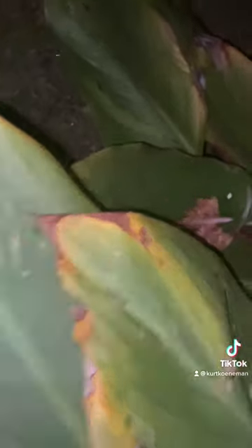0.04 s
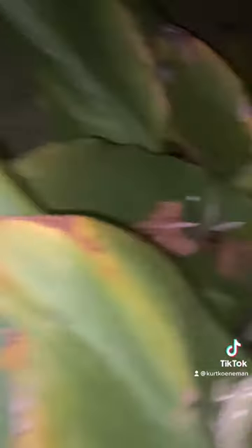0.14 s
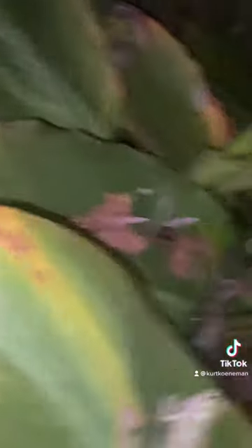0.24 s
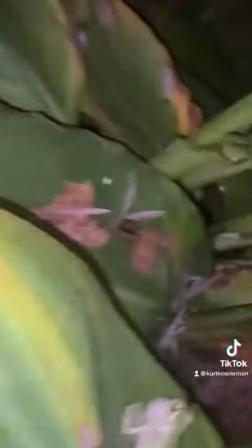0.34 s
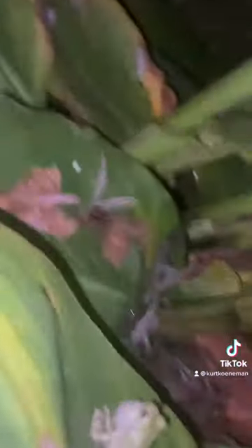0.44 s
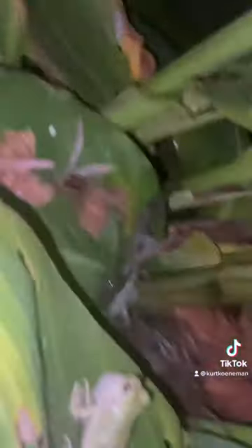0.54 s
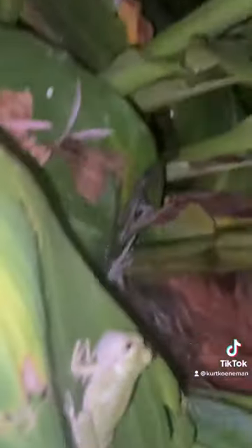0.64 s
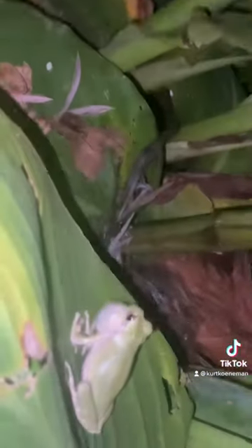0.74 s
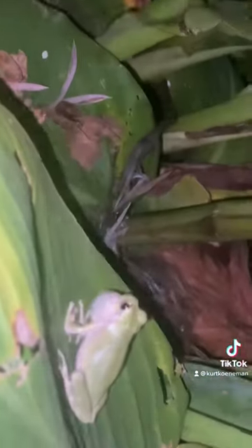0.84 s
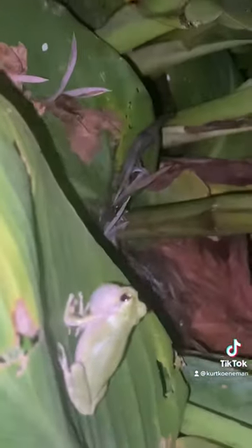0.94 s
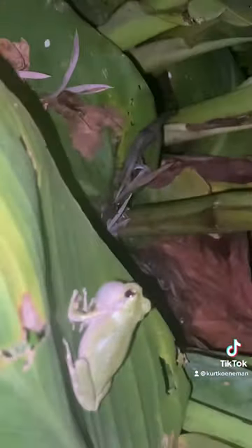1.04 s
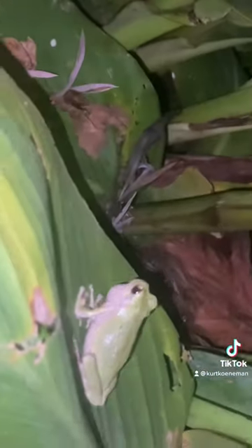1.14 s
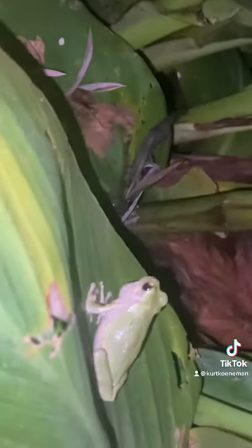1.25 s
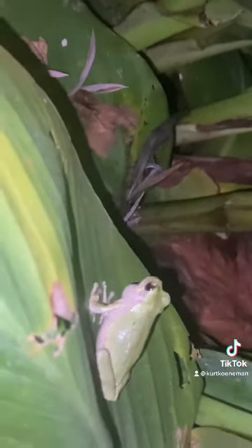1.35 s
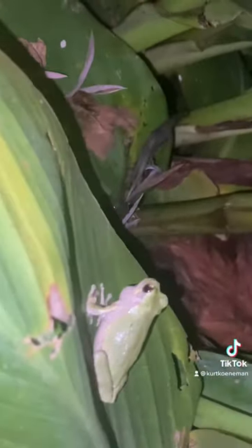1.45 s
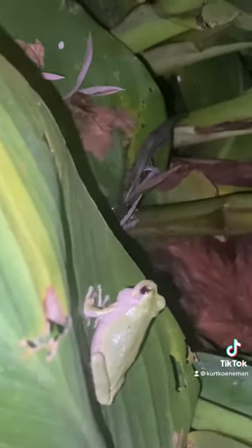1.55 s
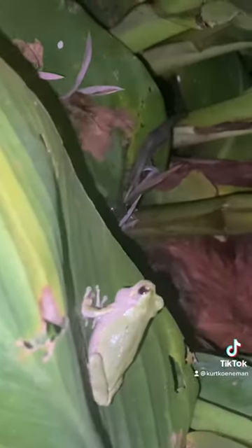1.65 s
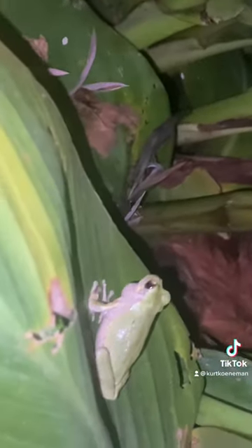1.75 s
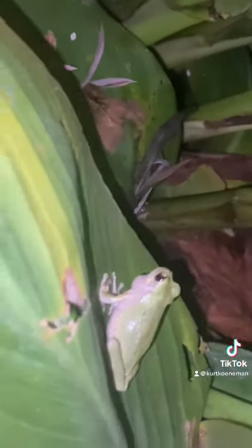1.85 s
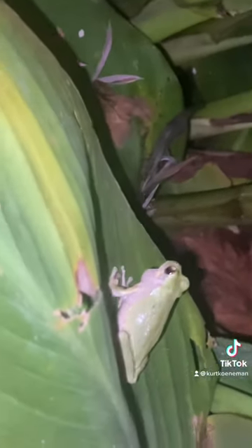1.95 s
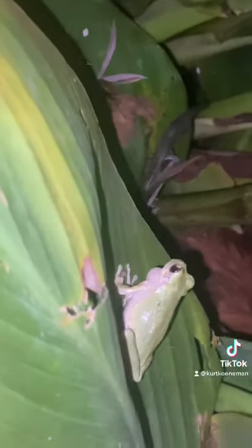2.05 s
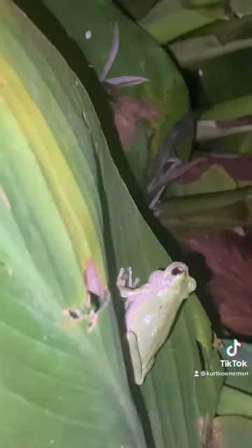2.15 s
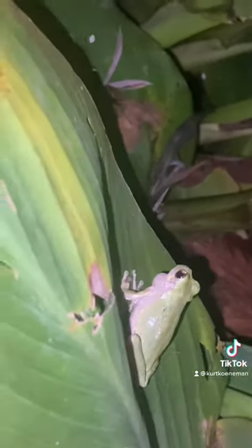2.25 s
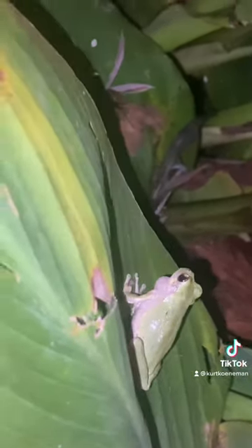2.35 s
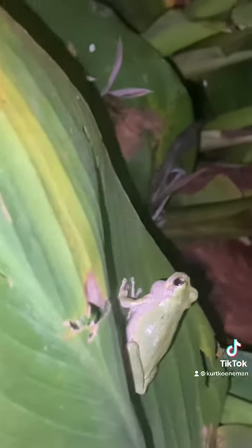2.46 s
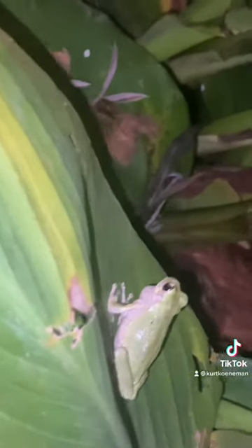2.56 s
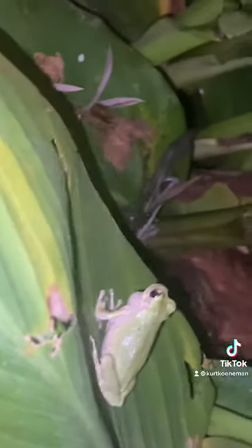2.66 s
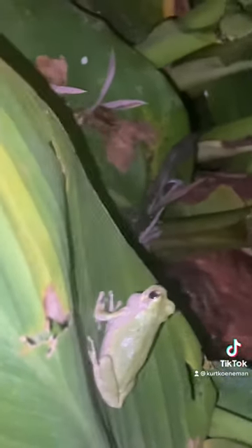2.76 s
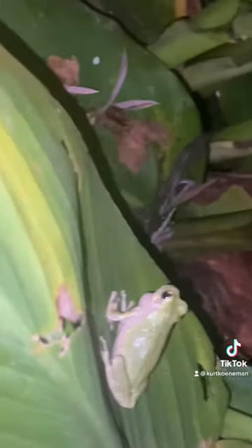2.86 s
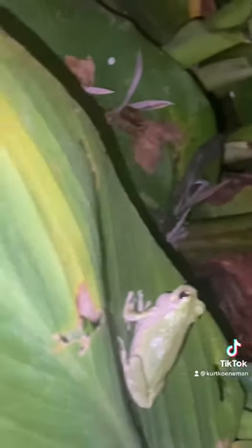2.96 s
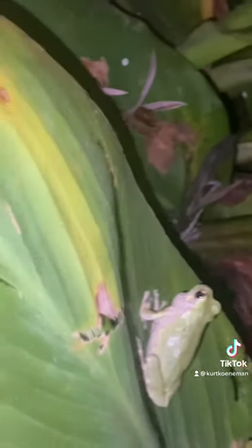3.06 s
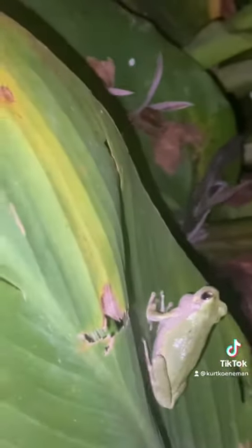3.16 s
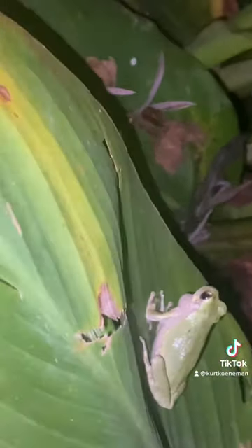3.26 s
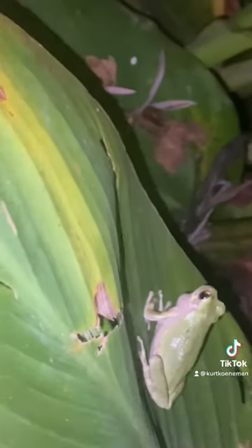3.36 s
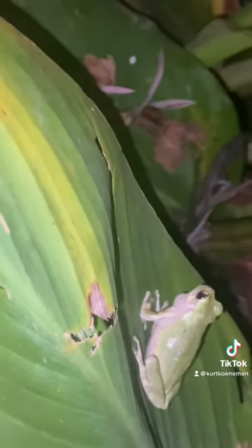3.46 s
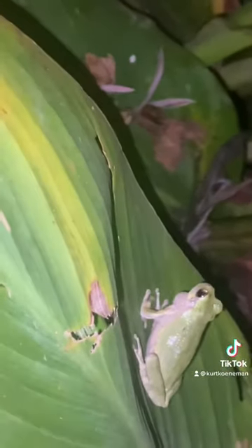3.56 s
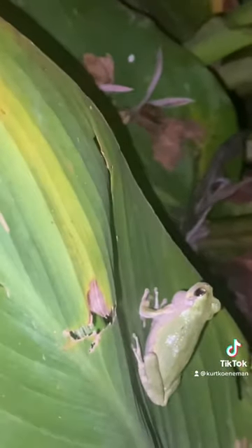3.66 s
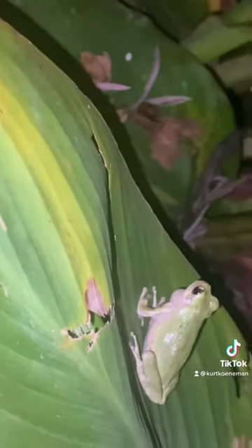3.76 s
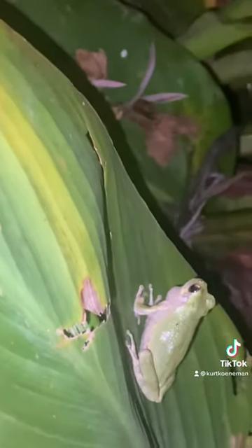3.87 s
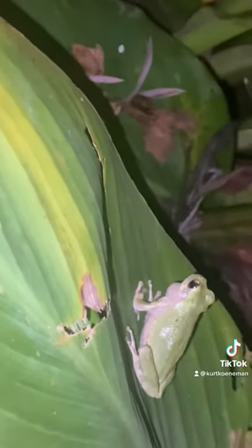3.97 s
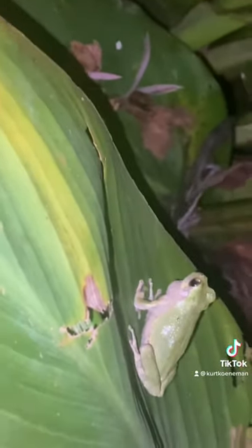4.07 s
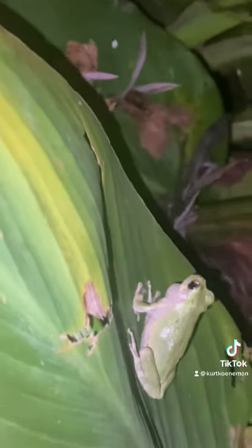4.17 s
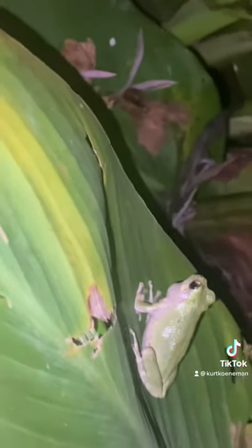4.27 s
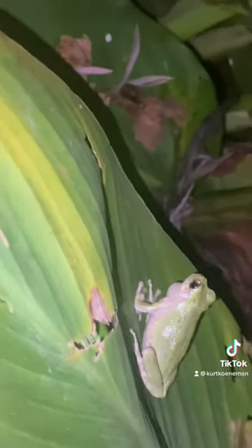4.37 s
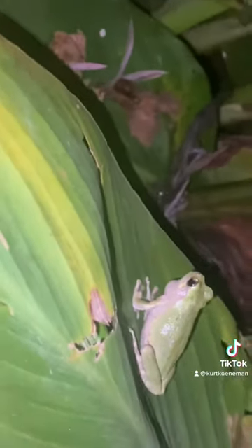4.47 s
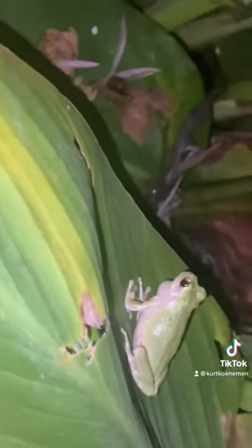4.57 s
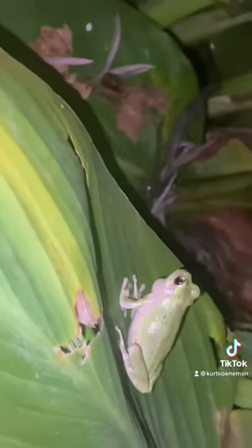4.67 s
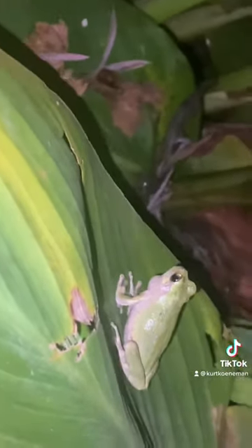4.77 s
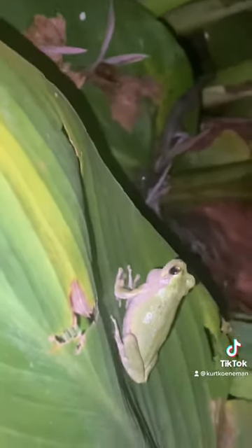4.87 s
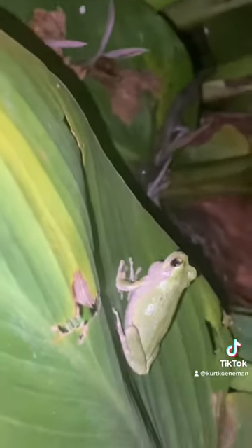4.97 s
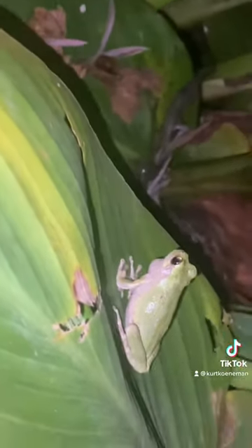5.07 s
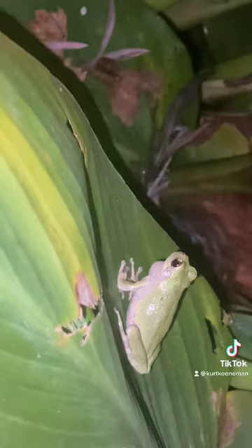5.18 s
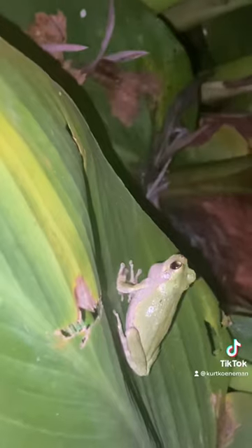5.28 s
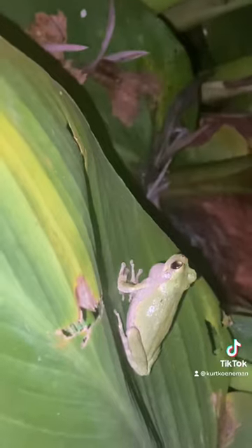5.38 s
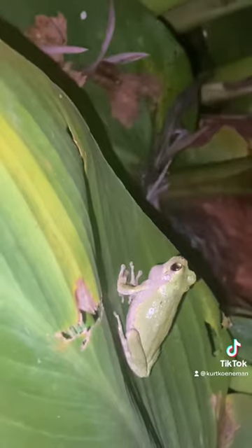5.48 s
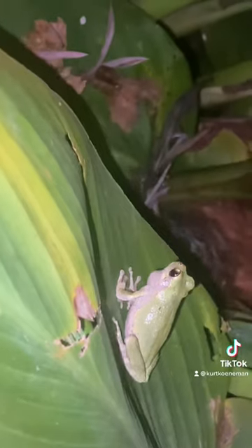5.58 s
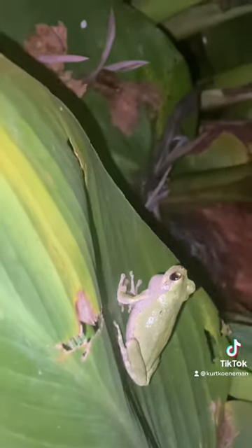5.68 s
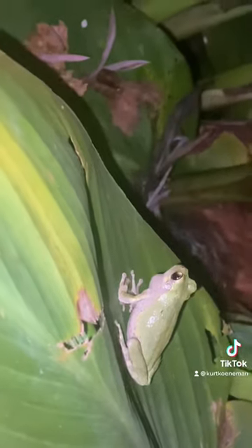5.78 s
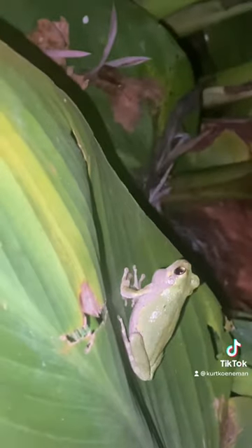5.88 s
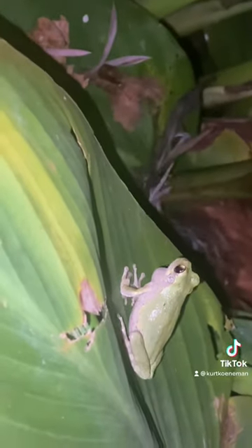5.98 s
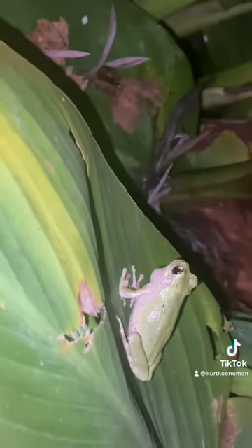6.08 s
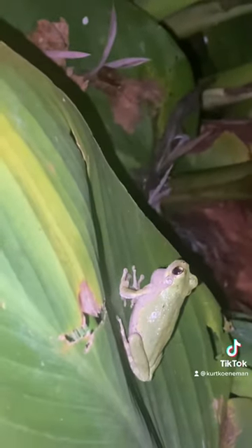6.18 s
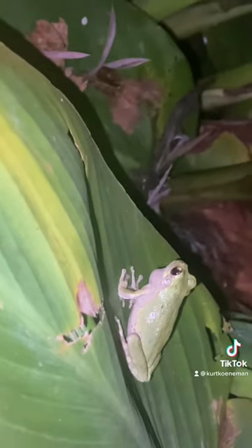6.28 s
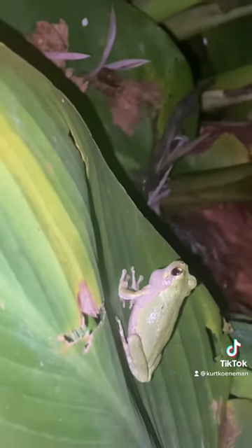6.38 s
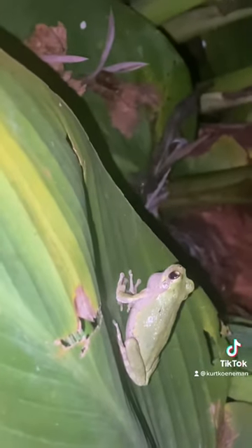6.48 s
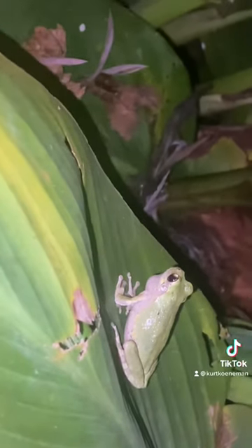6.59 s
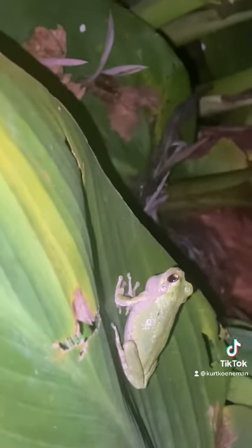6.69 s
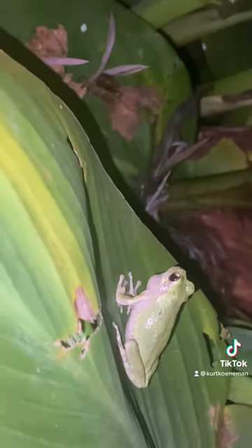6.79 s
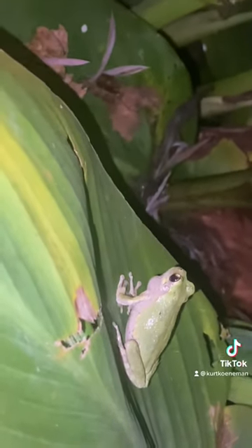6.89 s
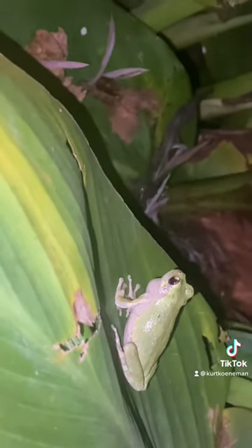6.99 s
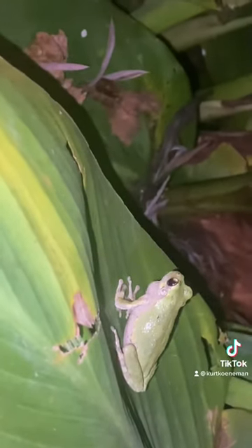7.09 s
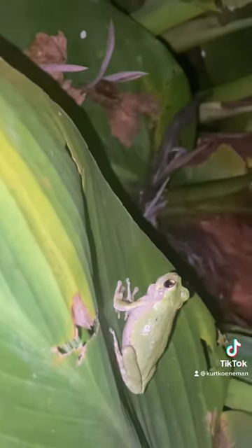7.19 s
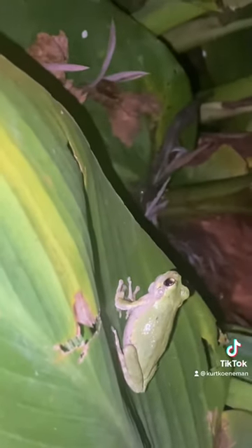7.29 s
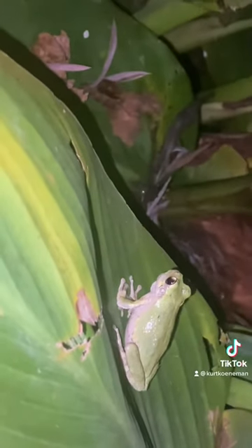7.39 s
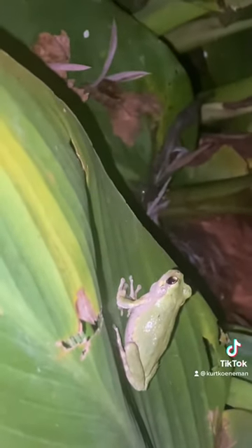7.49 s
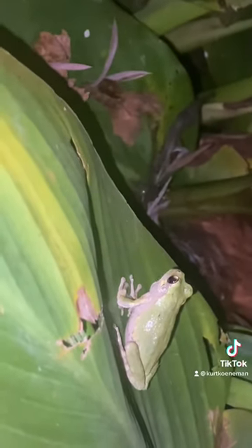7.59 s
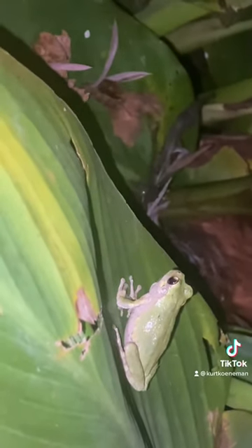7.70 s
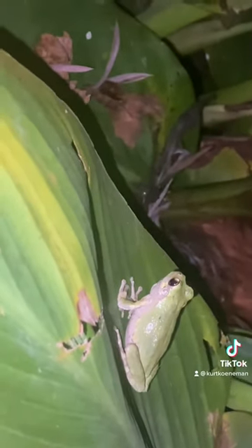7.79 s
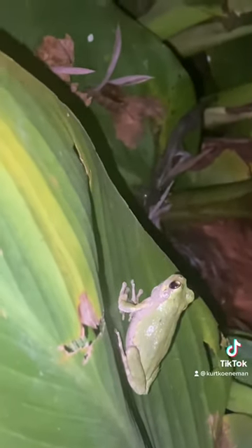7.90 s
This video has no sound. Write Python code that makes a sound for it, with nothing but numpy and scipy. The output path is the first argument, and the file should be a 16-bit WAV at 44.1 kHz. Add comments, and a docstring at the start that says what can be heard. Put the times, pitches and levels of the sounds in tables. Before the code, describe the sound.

A faint distant croak and a scratchy katydid rasp open a night garden, then a nearby frog croaks loudly, like a fast wooden ratchet with a nasal, squeaky edge. After it, weaker croaks come from farther off, alternating and overlapping with pulsing rasps and a few quick high insect zips. Continuous crickets, a washed-out frog chorus and a soft low fan hum fill the open air behind.

```python
"""Night in wet foliage: crickets trill, a far frog chorus hisses and a distant fan motor hums throughout.
A faint far croak opens the scene; katydids rasp in stroke-shaped noise; a close tree frog croaks at 0.3-1 s.
A croak is a rattle of about 60 throat pulses a second, each a short upward glide.
From 1.5 s more frogs farther off call, blurred by foliage; short high zips come at 2.4, 3.5 and 4.6 s.
Croaks and rasps alternate and overlap to the end, in stereo with one channel's treble phase turned."""
import sys
import numpy as np
from scipy import signal
from scipy.fft import rfft, irfft, next_fast_len
from scipy.io import wavfile
from scipy.ndimage import uniform_filter1d, map_coordinates

SR = 44100
rng = np.random.default_rng(int(sys.argv[2]) if len(sys.argv) > 2 else 0)


def store_pcm(level_fs):
    """Save levels as 16-bit WAV."""
    pcm = np.round(np.clip(level_fs, -1, 1) * 32767).astype(np.int16)
    wavfile.write(sys.argv[1], SR, np.atleast_2d(pcm).T)


N = 350154


def amp(db):
    """Decibels to gain."""
    return 10 ** (np.asarray(db) / 20)


def unit(x):
    """x at rms 1."""
    return x / np.sqrt(np.mean(x ** 2) + 1e-20)


def along(points, hz):
    """(f/Hz, value) points, linear in log frequency."""
    f, v = np.transpose(points)
    return np.interp(np.log(hz + 1), np.log(f + 1), v)


def wobble(rate_hz):
    """Smooth random curve, rate_hz knots a second."""
    knots = rng.standard_normal(int(N * rate_hz / SR) + 4)
    return map_coordinates(knots, [np.arange(N) * rate_hz / SR])


def filtered(x, response):
    """x times a complex response of frequency."""
    m = next_fast_len(N + SR // 4)
    return irfft(rfft(x, m) * response(np.fft.rfftfreq(m, 1 / SR)), m)[..., :N]


def noise(spectrum, side_db):
    """Stereo Gaussian noise with a dB-per-Hz spectrum; side_db sets the part the channels do not share."""
    def shape(hz):
        return amp(along(spectrum, hz)) * np.sqrt(SR / 2)

    mid, side = filtered(rng.standard_normal((2, N)), shape)
    return mid + amp(side_db) * np.array([side, -side])


def add(track, start_s, sound):
    """Mix sound into track at start_s."""
    part = track[max(0, round(start_s * SR)):][:len(sound)]
    part += sound[:len(part)]


def pulse(frog, length, dull_db):
    """One puff through the larynx: pitch slides up unevenly, each partial flares at its own time."""
    t = np.arange(1, SR // 40) / SR
    start_hz, end_hz, glide_s = frog["glide"]
    pitch_hz = end_hz + (start_hz - end_hz) * np.exp(-(t / glide_s) ** 2)
    jitter = .016 * unit(uniform_filter1d(rng.standard_normal(len(t)), size=24))
    phase = 2 * np.pi * np.cumsum(pitch_hz * (1 + jitter)) / SR
    wave = np.zeros(len(t))
    for harmonic, db, peak_s, spread in frog["partials"]:
        flare = np.exp(-.5 * (np.log(t / (peak_s * length)) / spread) ** 2)
        gain = amp(db - dull_db * harmonic + 1.35 * rng.standard_normal())
        wave += gain * flare * np.sin(round(harmonic) * phase)
    # equal energy per pulse: rms 1 at 60 pulses a second
    return wave / np.linalg.norm(wave) * np.sqrt(SR / 60)


def rattle(frog, croaks):
    """Pulse trains that swell, slow down and lengthen their pulses as the vocal sac fills."""
    track = np.zeros(N)
    for start_s, end_s, intervals, slowing, db, swell_db, fade_db in croaks:
        u = np.linspace(0, 1, round(intervals) + 1)
        times = start_s + (end_s - start_s) * (u + slowing * (u * np.sqrt(u) - u))
        lengths = 1 - 0.58 * np.exp(-(times - start_s) / 0.055)
        lengths *= 1 + .045 * rng.standard_normal(len(u))
        slack = np.exp(-(times - start_s) / 0.049)
        gains = amp(db - swell_db * slack - fade_db * u ** 2 + 0.66 * rng.standard_normal(len(u)))
        jittered = times + .00004 * rng.standard_normal(len(u))
        for t, length, gain, dull_db in zip(jittered, lengths, gains, 1.4 * slack):
            add(track, t, gain * pulse(frog, length, dull_db))
    return track


def carried(track, frog, leaves_db, t60_s, pan_db):
    """The sac rings and radiates no bass; ground and near leaves echo, deeper foliage scatters."""
    def voice_path(f):
        sac = 1 + sum(amp(db) * 1j * f * w / (c * c - f * f + 1j * f * w) for c, w, db in frog["ring"])
        echoes = 1 + sum(amp(db) * np.exp(-2j * np.pi * f * s) for s, db in frog["echoes"])
        low_cut = 1 / np.sqrt(1 + (970 / (f + 1)) ** 16)
        return sac * echoes * low_cut

    def width(f):
        return amp(along([(1500, 1), (2400, -3.5), (3600, -15)], f))

    direct = filtered(track, voice_path)
    t = np.arange(SR // 4) / SR
    tails = rng.standard_normal((2, len(t))) * amp(-60 * t / t60_s) * (1 - np.exp(-t / 0.0025))
    tails /= np.linalg.norm(tails[0])
    mid, side = signal.fftconvolve(direct[None], tails, axes=1)[:, :N] * amp(leaves_db)
    # the channels differ in level and phase, mostly in the lower voice
    lean = np.tanh(np.log(amp(pan_db)) / 2)
    side = filtered(side + lean * direct, width) + filtered(direct, lambda f: .2j * width(f))
    return direct + mid + np.array([side, -side])


# far croaks: first pulse t/s, last pulse t/s, pulse intervals (rounded), relative level/dB,
# opening swell/dB, closing fade/dB
FAR_CROAKS = [(.01, .26, 14, -50.5, 6.3, 0.5), (1.882, 2.305, 23.3, -40, 14, 6.5),
              (2.199, 2.682, 25, -46.5, 7, 5), (4.268, 4.616, 19.8, -53, 9, 11),
              (4.418, 4.895, 24.5, -43.5, 16, 3), (5.201, 5.66, 30.3, -53, 9, -6),
              (5.683, 6.12, 25, -42, 7.4, 14.5), (6.595, 7.044, 27, -42, 9.2, 4),
              (7.028, 7.506, 22, -57, 3.3, 1)]


def far_croaks():
    """Far croaks with one shared slowing (0-1), in the columns of the nearer ones."""
    slowing = .065
    return [(start_s, end_s, intervals, slowing, db, swell_db, fade_db)
            for start_s, end_s, intervals, db, swell_db, fade_db in FAR_CROAKS]


# croaks: first pulse t/s, last pulse t/s, pulse intervals, slowing (0-1), relative level/dB,
# opening swell/dB, closing fade/dB
NEAR_CROAKS = [(0.3296, 1.0164, 42, .1, -18, 12.5, 0.5)]
MIDDLE_CROAKS = [(3.1873, 3.656, 27, 0.094, -31.5, 20.3, 0), (5.4965, 5.914, 24, 0.069, -32, 18, 0)]
BACK_CROAKS = [(1.5402, 2.0583, 31, .07, -37, 25, -0.86), (6.412, 6.9658, 33, .05, -36.5, 15.6, 0)]
# single pulses around the close croak: t/s, relative level/dB, length/full pulse, dulling/(dB per harmonic)
LONE_PULSES = [(0.2837, -29.5, 0.43, 4.5), (.314, -35.5, 0.55, -1), (1.0381, -19.5, 0.77, -1)]
# frog voices. glide: start f/Hz, end f/Hz, time constant/s;
# partials: harmonic, relative level/dB, peak t/s at full length, spread/ln(t);
# echoes off ground and leaves: delay t/s, level/dB; ring of the vocal sac: f/Hz, width/Hz, level/dB
NEAR_FROG = dict(glide=(1109, 1646, 0.0052), partials=[(1, 1.5, 0.0041, 0.49), (2, 2.5, 0.0014, 0.72),
             (3, -16.5, 0.0021, 0.61), (4, -30.5, 0.0029, 0.66), (6, -25, 0.0033, 0.43),
             (7, -23, 0.0017, 0.52)], echoes=[(.00345, -12), (.00381, -12), (.0053, -21.5), (.0135, -25.5)],
             ring=[(2030, 84.3, -18), (2880, 156, -0.5), (3877, 184, 6.5), (5440, 340, -3), (8080, 110, 8),
             (8760, 200, -3)])
MIDDLE_FROG = dict(glide=(1130, 1542, 0.0047), partials=[(1, -5, 0.0037, 0.23), (2, 2, 0.002, 0.59),
               (3, -28.5, 0.0011, 0.59), (4, -26, 0.001, 0.61), (6, -27.5, 0.0046, 0.29),
               (7, -32, 0.0033, 0.62)], echoes=[(.00258, -14), (.00534, -14.5), (.00558, -10),
               (.0088, -15.5), (.0135, -18.5)], ring=[(1170, 490, -24), (1732, 42, 15.5), (3527, 86, 9),
               (8700, 180, -6)])
BACK_FROG = dict(glide=(1265, 1666, 0.0078), partials=[(1, -4, 0.0064, 0.28), (2, 1.5, 0.0032, 0.49),
             (3, -14.5, 0.0015, 0.94), (4, -31, .0015, .53)], echoes=[(.00235, -8.5), (.00412, -8),
             (.0099, -27)], ring=[(1213, 75, 0.5)])
FAR_FROG = dict(glide=(1290, 1528, 0.005), partials=[(1, 3, 0.0039, 0.37), (2, 5, 0.0032, 0.56),
            (3, -18, .004, 0.94)], echoes=[(.00124, -4), (.0051, -6), (.009, -7.5)],
            ring=[(2730, 310, -12.5)])


def frogs():
    """Four distances: the farther the frog, the more the foliage blurs its pulses."""
    near = rattle(NEAR_FROG, NEAR_CROAKS)
    for t, db, length, dull_db in LONE_PULSES:
        add(near, t, amp(db) * pulse(NEAR_FROG, length, dull_db))
    middle = rattle(MIDDLE_FROG, MIDDLE_CROAKS)
    back = rattle(BACK_FROG, BACK_CROAKS)
    far = rattle(FAR_FROG, far_croaks())
    return (amp(-1.38) * carried(near, NEAR_FROG, leaves_db=-12.5, t60_s=.05, pan_db=2)
            + amp(-0.77) * carried(middle, MIDDLE_FROG, leaves_db=-5.5, t60_s=0.049, pan_db=-2.3)
            + amp(-2.0) * carried(back, BACK_FROG, leaves_db=-4.5, t60_s=0.063, pan_db=4.0)
            + amp(-5.5) * carried(far, FAR_FROG, leaves_db=-3.0, t60_s=0.17, pan_db=4.0))


def strokes(rows):
    """Gain of wing strokes that swell, hold and drop away a little faster than they rose."""
    t = np.arange(N) / SR
    level = np.zeros(N)
    for centre_s, half_s, db in rows:
        u = (t - centre_s) / half_s
        near = abs(u) < 4
        steepness = np.where(u[near] < 0, 1.8, 2.8)
        level[near] += amp(db + 1.0) * np.exp(-.5 * abs(u[near]) ** steepness)
    return level


# katydid bouts: first full stroke t/s, strokes, stroke period/s, relative level/dB
RASP_BOUTS = [(.137, 7, .468, 0), (3.631, 2, .42, 1.5), (4.74, 2, .43, .8), (5.84, 2, .46, 1),
              (7.01, 1, .45, -1), (7.64, 1, .45, 1)]
RASP_HALF_S = 0.053
LEAD_IN_S, LEAD_IN_HALF_S, LEAD_IN_DB = 0.32, 0.056, -6.5


def rasp_strokes():
    """Per bout one soft, slower lead-in, then evenly paced full strokes: centre t/s, half length/s, level/dB."""
    rows = []
    for start_s, count, step_s, db in RASP_BOUTS:
        rows.append((start_s - LEAD_IN_S, LEAD_IN_HALF_S, LEAD_IN_DB))
        rows += [(start_s + k * step_s, RASP_HALF_S, db) for k in range(round(count))]
    return rows


# rasp spectrum: f/Hz, relative level/(dB per Hz)
RASP_SPECTRUM = [(700, -125), (1500, -100), (2000, -80.5), (2600, -81.5), (3300, -82.5), (4300, -76),
                 (5100, -81.5), (6000, -101), (9000, -105), (10500, -95.5), (12000, -92), (15500, -96.5)]


def katydids():
    """Wing files scrape: noise in strokes, roughened by the grain of the teeth."""
    teeth = amp(1.4 * wobble(45) + 2.2 * wobble(600))
    return amp(-2) * strokes(rasp_strokes()) * teeth * noise(RASP_SPECTRUM, side_db=-40.0)


# zip bursts of another insect: first zip t/s, zips, relative level/dB
ZIP_BURSTS = [(2.435, 5, 0), (3.539, 3, 0), (4.613, 2, 1)]
ZIP_STEP_S, ZIP_HALF_S, FIRST_ZIP_HALF_S = 0.0618, .019, .012


def zip_strokes():
    """Per burst a quick even run of zips, the first shorter: centre t/s, half length/s, level/dB."""
    rows = []
    for start_s, count, db in ZIP_BURSTS:
        for k in range(round(count)):
            half_s = ZIP_HALF_S if k else FIRST_ZIP_HALF_S
            rows.append((start_s + k * ZIP_STEP_S, half_s, db))
    return rows


# zip spectrum: f/Hz, relative level/(dB per Hz)
ZIP_SPECTRUM = [(3000, -120), (6200, -88.5), (8000, -83.5), (10000, -86.5), (12000, -93.5), (15500, -101)]


def zips():
    """Another insect's short high wing strokes: grainy noise bursts."""
    return strokes(zip_strokes()) * amp(1.8 * wobble(500)) * noise(ZIP_SPECTRUM, side_db=-16.0)


# cricket spectrum: f/Hz, mean level/(dB per Hz)
CRICKET_SPECTRUM = [(5600, -120), (6300, -99), (6750, -71.5), (7100, -88), (7600, -93), (8500, -93.5),
                    (9600, -112)]


def crickets():
    """Continuous trill: noise peaked near 6.75 kHz with a fluttering level."""
    return amp(1.3 * wobble(9.8) + 1.2 * wobble(60)) * noise(CRICKET_SPECTRUM, side_db=-23.5)


# distant frog chorus spectrum: f/Hz, mean level/(dB per Hz)
CHORUS_SPECTRUM = [(500, -125), (800, -114), (1200, -109), (1600, -100), (2000, -85), (2250, -94),
                   (2560, -77.5), (2900, -86.5), (3400, -95), (4400, -91), (6000, -100), (9500, -108),
                   (12000, -111), (15500, -119)]


def chorus():
    """Distant frogs merged into noise, strongest near 2.56 kHz, with a fluttering level."""
    return amp(2.3 * wobble(8.7) + 1.3 * wobble(80)) * noise(CHORUS_SPECTRUM, side_db=-14.0)


# motor tones: f/Hz, mean rms level/dB before the channel trims
HUM_TONES = [(118.5, -60), (234.3, -74.5), (293, -54), (351.7, -70), (586, -82.5)]
# rumble spectrum: f/Hz, level/(dB per Hz)
RUMBLE_SPECTRUM = [(20, -104), (33, -82.5), (45, -80), (65, -71.5), (88, -77), (118, -75.5), (145, -80.5),
                   (250, -81), (330, -87.5), (500, -94), (660, -108), (1000, -130)]


def machine():
    """A distant fan motor: nearly steady tones over a low rumble."""
    t = np.arange(N) / SR
    tones = np.zeros(N)
    for hz, db in HUM_TONES:
        level = amp(db + 0.3 * wobble(4.4)) * np.sqrt(2)
        tones += level * np.sin(2 * np.pi * hz * t + 0.13 * wobble(3))
    channel_trims = amp([[-1.3], [1.1]])
    return tones * channel_trims + noise(RUMBLE_SPECTRUM, side_db=-18.0)


def scene():
    """The garden at night."""
    return frogs() + katydids() + zips() + crickets() + chorus() + machine()


# treble phase of the first channel against the second, turned in bands: f/Hz, phase/rad
TREBLE_PHASE = [(5950, 0), (6450, 2.8), (7000, np.pi), (7600, np.pi), (8300, 3.5), (9200, 2 * np.pi),
                (11800, 2 * np.pi), (12700, 3 * np.pi), (14300, 3 * np.pi), (15100, 4 * np.pi)]
TOP_HZ = 15750


def record(dry):
    """Stereo treble: one channel's phase turned in bands, nothing kept above TOP_HZ."""
    def response(hz):
        turned = np.exp(1j * along(TREBLE_PHASE, hz))
        return np.array([turned, np.ones(len(hz))]) * (hz < TOP_HZ)

    return filtered(dry, response)


dry = scene()
out = record(dry)
store_pcm(out)
```